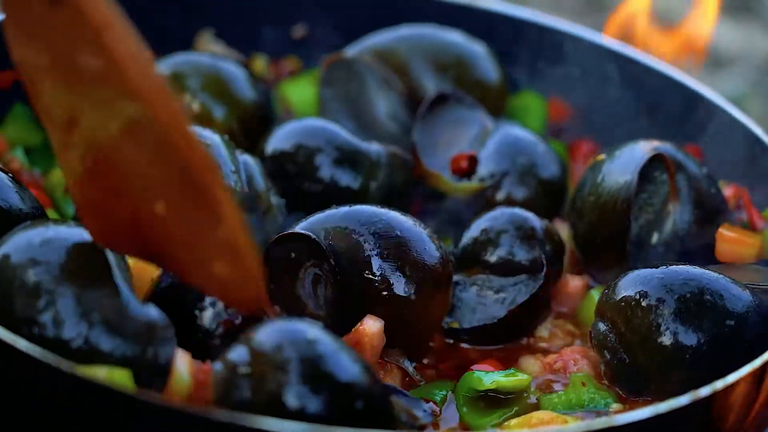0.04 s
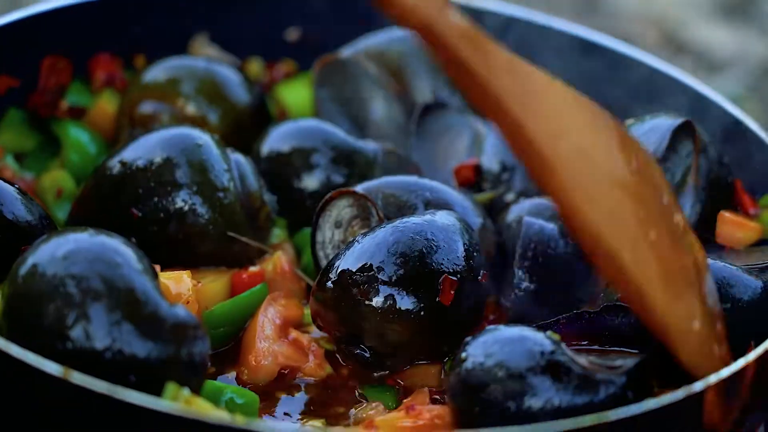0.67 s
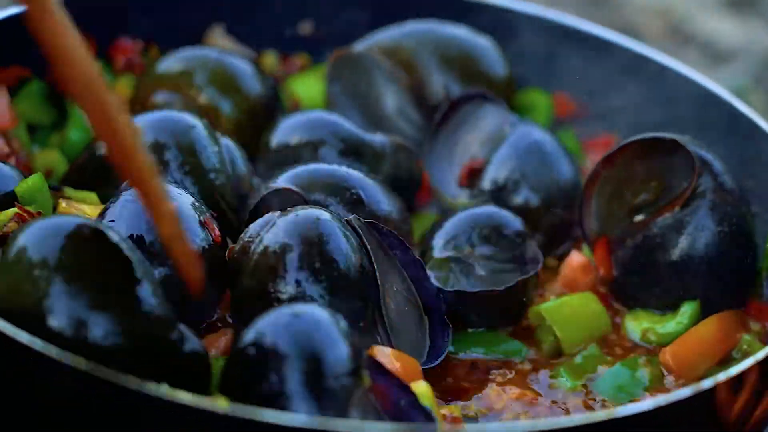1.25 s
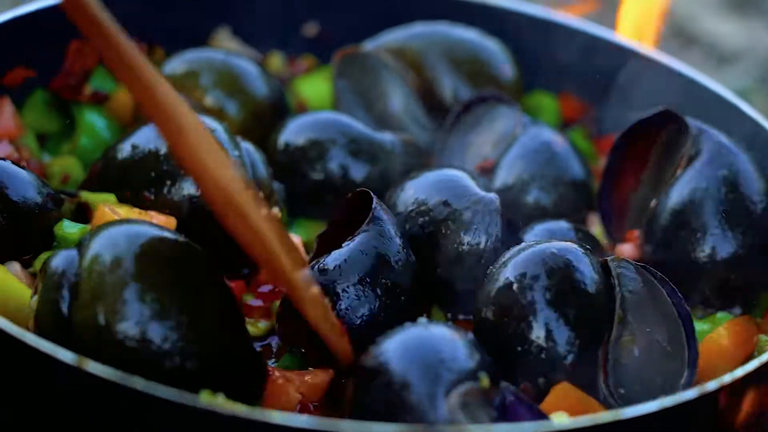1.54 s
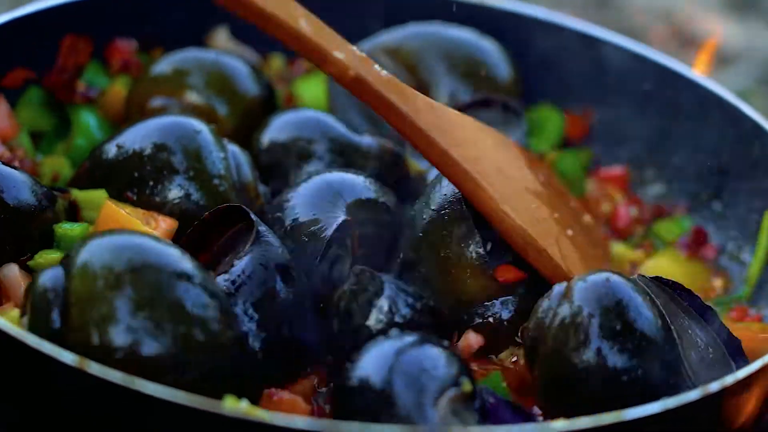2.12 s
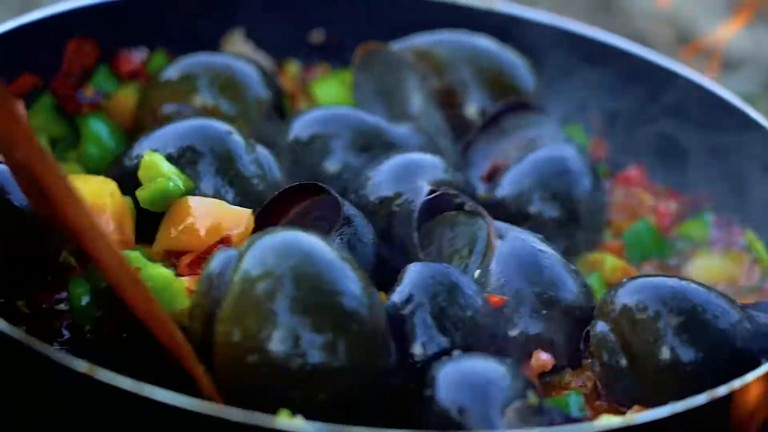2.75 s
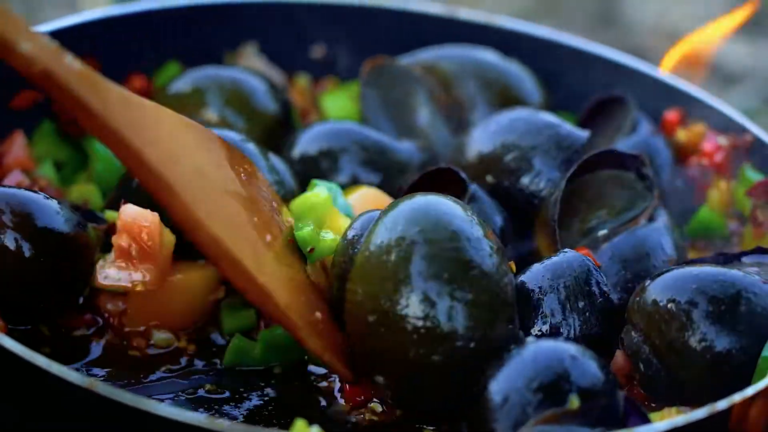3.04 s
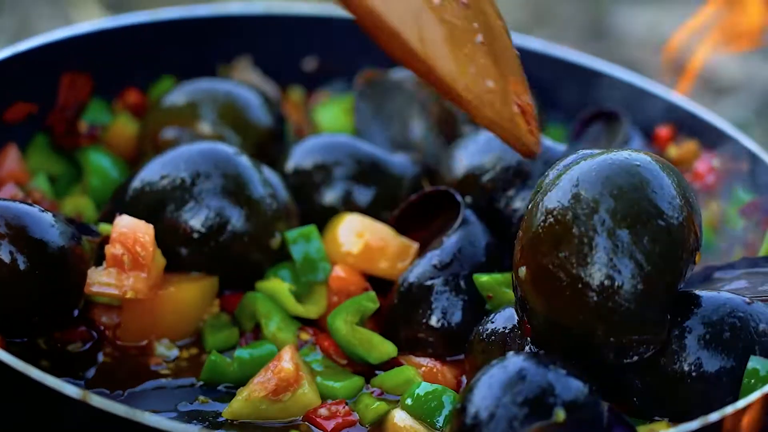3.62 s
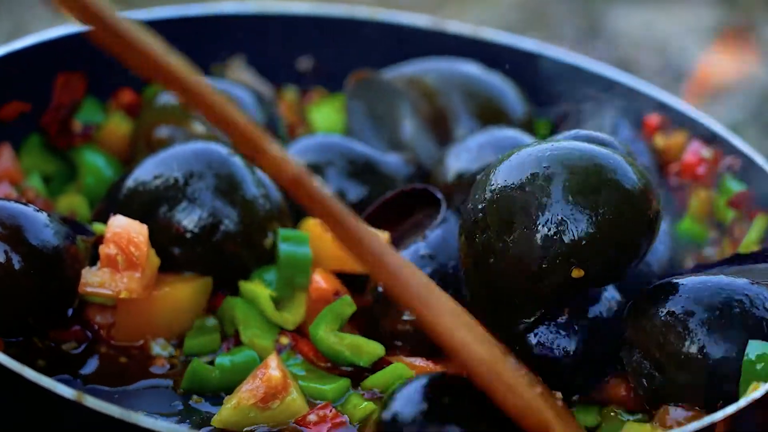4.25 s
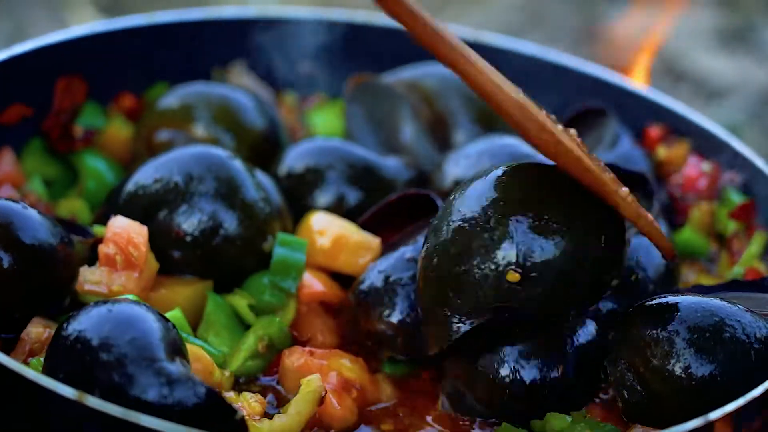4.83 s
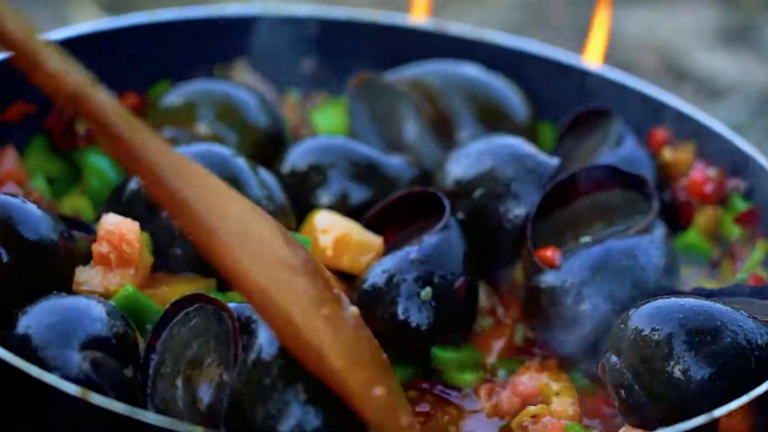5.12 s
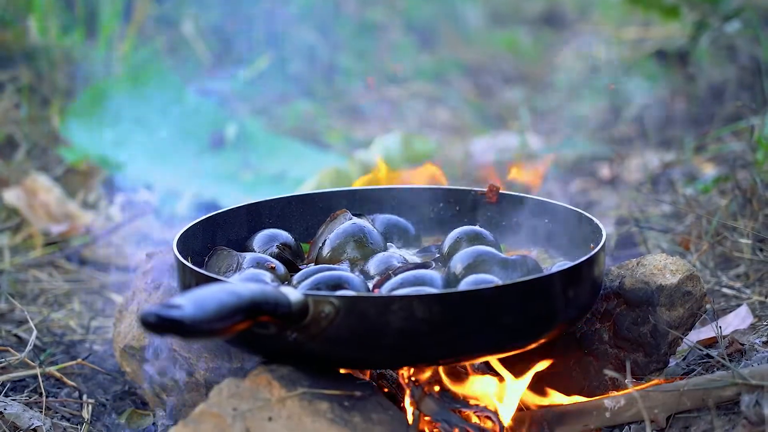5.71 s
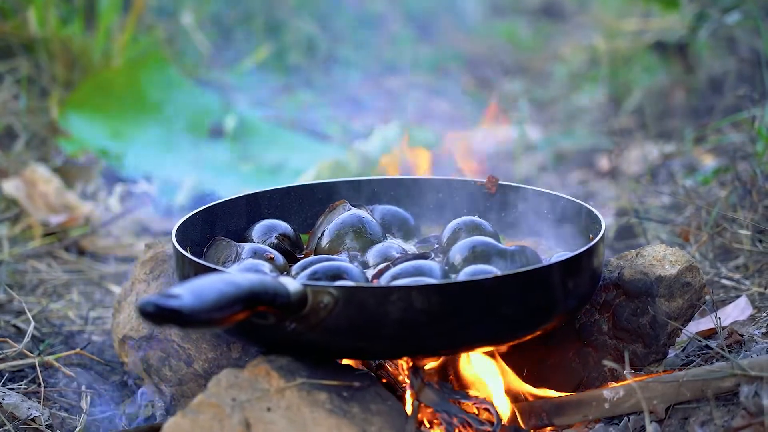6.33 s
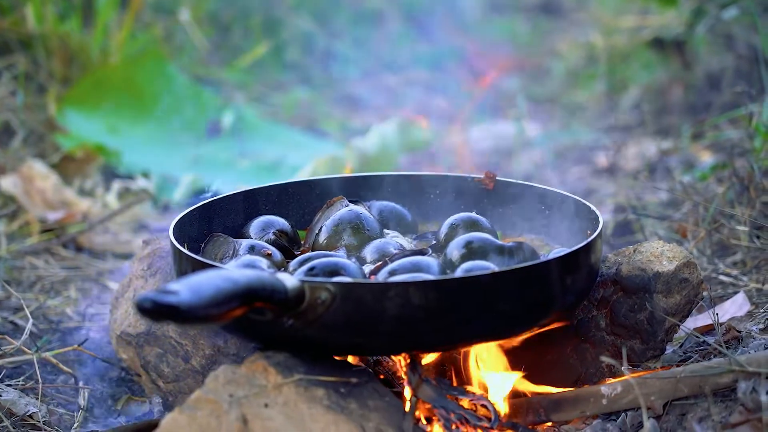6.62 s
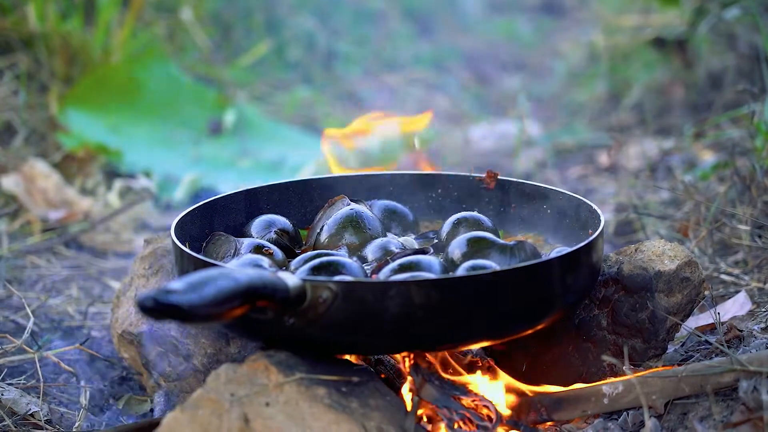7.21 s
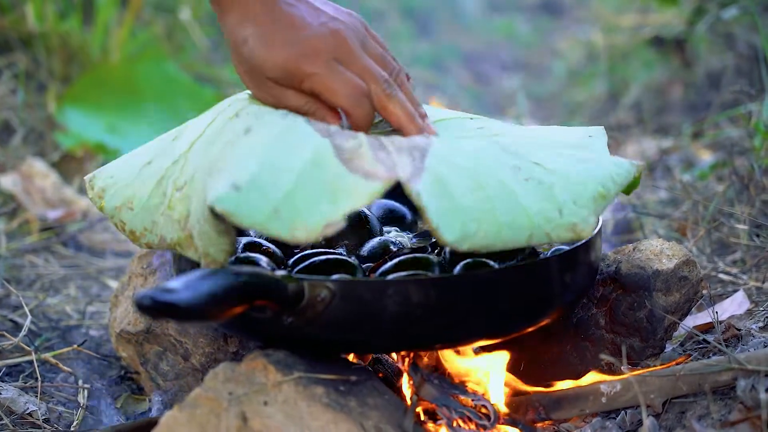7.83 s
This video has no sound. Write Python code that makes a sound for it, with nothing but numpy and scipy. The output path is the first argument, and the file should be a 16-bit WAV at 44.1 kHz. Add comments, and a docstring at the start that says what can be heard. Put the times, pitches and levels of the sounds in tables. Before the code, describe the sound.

From the start, sauce, vegetables and snail shells fry very close in a pan over an outdoor wood fire: a loud, bright, wet sizzle, slightly to the right, with sharp spits of fat. Flames rumble underneath, swelling with a few puffs of wind. A wooden spatula stirs throughout, giving hollow knocks, short scrapes and clusters of hard shell clacks, strongest around 0.8, 1.4, 2.1, 2.8, 4.2 and 4.9 seconds. The hardest knocks briefly dip the sizzle. Steam hisses brighter near 3.2 seconds, and a shell topples with a soft thud at about 5 seconds.

At 5.3 seconds the frying cuts off and a much quieter view from a step away fades in. Sauce simmers and plops gently over low flames and ticking embers. Firewood snaps irregularly, sharpest near 6.3 and 7.2 seconds. A faint, high insect pulses in the grass over a distant low hum until the end, around 8 seconds.

```python
"""Sauce sizzles and spits close up: snail shells and vegetables fry in a pan on a wood fire outdoors.
Steam bursts in the hot fat while a wooden spatula knocks the shells against each other and the pan,
over the rumble of the flames; the hardest knocks make a limiter duck the sizzle.
Then a wider view fades in: the sauce simmers softly, sap snaps in the firewood and an insect pulses
in the grass, over a faint, distant hum."""
import sys
import numpy as np
from scipy import signal
from scipy.fft import rfft, irfft, next_fast_len
from scipy.io import wavfile
from scipy.ndimage import uniform_filter1d, minimum_filter1d

SR = 44100
rng = np.random.default_rng(int(sys.argv[2]) if len(sys.argv) > 2 else 0)


def to_wav(sig):
    """Store sig (one row per channel, or 1-D mono) as 16-bit WAV at the path in sys.argv[1].

    Samples outside -1..1 are clipped; the rate is SR.
    """
    pcm = np.clip(np.atleast_2d(sig), -1, 1) * 32767
    pcm = np.round(pcm).astype(np.int16)
    wavfile.write(sys.argv[1], SR, pcm.T)  # frames by channels


N = 351477
T = np.arange(N) / SR

# ride of the frying: (time [s], sizzle level [dB], steam hiss trim [dB])
FRYING_LEVELS = [(0, -26, 1.5), (.28, -27.5, -1), (.43, -24.5, 1), (.52, -27, 1), (.68, -26.5, 0),
                 (.75, -27, -2), (1.05, -25.5, 1), (1.4, -28, -2.5), (1.6, -25.5, -3), (1.8, -28, -4.5),
                 (2.1, -27.5, -1.5), (2.2, -26.5, 0), (2.55, -28, -5), (2.76, -27, -4), (2.87, -26, -2.5),
                 (2.98, -28.5, 2), (3.17, -27, 7), (3.42, -27, 1), (3.55, -28, 3), (3.66, -27, 4),
                 (3.77, -26.5, 1), (4.1, -28, 1.5), (4.45, -27.5, 2), (4.8, -27.5, -0.5), (5.12, -26.5, 1),
                 (5.17, -30.5, 1), (5.25, -26, -1.5)]
# tone of bursting steam: (frequency [Hz], gain [dB])
SIZZLE_EQ = [(150, -23.5), (400, -7.5), (600, -6), (790, -19.5), (1000, -5.5), (1500, -3.5), (2700, -0.5),
             (3400, -2), (4500, 2.5), (5150, -1), (5700, 1.5), (9000, 1.5), (10500, -0.5), (16000, -2.5)]
# extra brightness of the finest steam: (frequency [Hz], gain [dB])
STEAM_EQ = [(3000, -1.1), (12000, 0.7)]
# loudest spits of fat: (time [s], peak [dB])
FAT_SPITS = [(0.243, -12), (0.404, -9), (0.438, -5.5), (0.562, -6), (0.608, -4), (0.686, -9), (0.791, -9),
             (0.928, -8), (0.967, -10), (1.104, -4), (1.202, -6), (1.506, -6), (1.723, -7), (2.183, -4),
             (2.473, -8.5), (2.691, -6), (2.82, -8.5), (2.903, -5), (3.039, -6), (3.173, -6.5), (3.777, -7),
             (3.861, -5), (4.071, -5.5), (4.734, -8), (4.777, -8.5), (5.011, -7), (5.111, -10), (5.139, -5),
             (5.236, -5)]
# tone of a spit: (frequency [Hz], gain [dB])
SPIT_EQ = [(300, -26), (1500, -12), (3000, 0.5), (7000, 2), (10000, -4.5), (16000, -3), (19000, -20.5)]
# shell hits: (time [s], level [dB], pitch [Hz], ring length [x a free shell's],
# pan ring [dB re shell], lip ring [dB re shell], lip pitch [Hz])
SHELL_KNOCKS = [(0.184, -19.5, 1620, 0.63, 1, -6, 2280), (0.223, -23, 2580, .3, -20, -4, 3920),
                (0.2644, -14, 1650, 0.84, -9.5, -9, 2280), (0.317, -17, 2030, 1.2, -26, -26, 3700),
                (0.3935, -22.5, 1970, 0.27, -20, -7, 2700), (0.707, -13, 1680, 0.46, -5, -1, 5820),
                (0.7242, -24, 1500, .5, -1, 4, 3900), (0.787, -23, 1480, .5, -9, -6, 2000),
                (0.82, -12, 1935, 1.3, -28, -11, 3440), (0.8595, -30.5, 1860, .6, 2.5, 6.5, 4320),
                (0.881, -27, 2000, .8, -18, -18, 3600), (0.909, -23.5, 2020, 1, -22, -18, 3600),
                (1.061, -26, 2630, .4, -2.5, -8, 3800), (1.076, -14.5, 2150, 0.69, -12, -14, 3500),
                (1.0915, -25, 1800, .7, -17.5, -8, 2800), (1.321, -12, 2110, 1.1, -16, -4, 3940),
                (1.3654, -25, 2900, .3, -21, -4.5, 4600), (1.3926, -13, 1880, 0.56, -19, -17, 3200),
                (1.4, -26, 3200, .6, -20, -3, 3900), (1.405, -24, 2000, .6, -12, -12, 3500),
                (1.4094, -12.5, 2150, .8, -18, -11, 3500), (1.4308, -18, 2450, 0.64, -14, -8, 2970),
                (1.528, -26.5, 1900, .6, -14, -10, 3000), (1.8247, -24, 2250, 0.39, -18, -0.5, 4300),
                (1.8888, -12.5, 1950, 0.6, -8.5, -5, 3630), (2.055, -27, 2000, .3, -12, 0, 4270),
                (2.0907, -13, 1570, .45, -8, -3, 2880), (2.1066, -20, 1440, .7, -3, -13, 4500),
                (2.136, -20, 2520, 0.28, -24, -9, 3200), (2.1502, -19, 1360, 1.2, -11, -8, 2700),
                (2.3871, -23.5, 2590, .3, -8, -4, 3500), (2.4173, -20, 1920, .7, -12, 0.5, 3370),
                (2.6022, -22.5, 2320, .6, -7, -1.5, 4300), (2.6072, -21.5, 1940, 1.7, -2.5, 0, 2500),
                (2.654, -25.5, 2200, .5, -8, -3, 3600), (2.699, -25.5, 3620, .3, -22, 0, 5460),
                (2.728, -25, 1800, .4, -21.5, -2, 4500), (2.7352, -12.5, 1490, 1.9, -30, -6, 2900),
                (2.7361, -18, 3000, 0.44, -25, 0.5, 5870), (2.7698, -15, 1370, 0.51, -3.5, -5, 2040),
                (2.836, -18, 1880, .7, -15, -10.5, 2700), (2.8894, -16.5, 2000, 0.6, -14, -6, 1290),
                (3.3068, -21, 1390, 0.5, -9, -6, 2000), (3.367, -21.5, 1340, .8, -4.5, -3, 2200),
                (3.378, -23.5, 2160, .5, -9, -1.5, 4400), (3.417, -20.5, 1810, 1.2, -7, -19, 2600),
                (3.508, -22.5, 2850, 0.28, -17, -21, 4500), (3.709, -23, 1920, .5, 4, -7, 2650),
                (3.7277, -21.5, 2120, 0.55, -15, -3, 3500), (3.7786, -28, 2250, .5, 8.5, -6, 3530),
                (4.1524, -19, 3400, 1.3, -21, -17, 4930), (4.156, -13.5, 2030, 0.97, -5.5, -6.5, 3760),
                (4.208, -26, 1450, .6, -8, -3, 2700), (4.284, -28, 1730, .5, -4, -10, 3300),
                (4.3566, -28, 1890, .5, -0.5, -12, 3600), (4.3786, -30, 2540, .5, 3.5, -14, 4200),
                (4.854, -11, 2140, 0.54, -11, -12, 2920), (4.9556, -21.5, 1370, .8, -5, -14, 2700),
                (4.9695, -25.5, 1340, .6, 11, -1, 1750), (5.0185, -24, 2750, .45, -15, -7, 1450),
                (5.0467, -26, 3160, .4, -14, 1, 3900)]
# ring of a free shell: (ratio to its pitch [x], level [dB], t60 [s])
FREE_SHELL_MODES = [(0.699, -24.5, 0.013), (.85, -26, .012), (1.001, 2.5, 0.018), (1.14, 1.5, 0.013),
                    (1.33, -8, 0.01), (1.55, -14, 0.0083), (1.83, -5, 0.018), (2.3, -17, .01),
                    (2.8, -13, .014)]
# ring of a shell's thin lip: (ratio to the lip pitch [x], level [dB], t60 [s])
SHELL_LIP_MODES = [(.88, -8, 0.0071), (1, 1.5, 0.021), (1.1, -8.5, .01), (1.5, -4.5, 0.019)]
# ring of the food-damped pan: (frequency [Hz], level [dB], t60 [s])
DAMPED_PAN_MODES = [(427, -20.5, 0.01), (520, -7.5, 0.012), (615, 11, 0.022), (810, -3, 0.016),
                    (975, -1, 0.027), (1370, -6, 0.017), (1620, -8.5, .014), (2320, -11, .012)]
# a shell topples into the sauce: when, and its (frequency [Hz], level [dB], t60 [s])
THUD_S, THUD_MODES = 4.965, [(185, -24, 0.075), (243, -21, 0.058), (338, -29, 0.057)]
# hollow knocks of the spatula: (time [s], level [dB], pitch [Hz])
BLADE_KNOCKS = [(0.276, -30, 900), (0.299, -28, 1050), (0.3936, -28, 1110), (0.793, -24.5, 850),
                (0.9955, -28, 1100), (1.383, -25, 1160), (1.3928, -18, 1080), (2.286, -29, 1010),
                (2.332, -27, 646), (2.753, -27, 1150), (2.803, -22.5, 1250), (2.937, -30.5, 1150),
                (3.4166, -24, 980), (3.709, -16, 990), (3.7274, -30, 1100), (5.016, -30, 950)]
# ring of its wooden blade: (ratio to its pitch [x], level [dB], t60 [s])
BLADE_MODES = [(.55, -5.5, .01), (1, -1, 0.014), (1.35, -1, .009), (2.1, -7.5, .006)]
# the spatula pushes the shells along: (centre [s], length [s], level [dB])
PUSHES = [(0.277, 0.21, -40.5), (0.79, 0.086, -34.5), (0.898, 0.093, -36.5), (1.062, 0.14, -37),
          (1.383, 0.008, -32), (1.404, 0.017, -30), (2.124, 0.13, -32), (2.37, 0.12, -38.5),
          (2.62, 0.037, -34), (2.812, 0.092, -32.5), (3.387, 0.093, -36.5), (4.168, 0.02, -31),
          (4.223, 0.06, -36.5), (4.356, 0.12, -40), (4.936, 0.047, -29), (5.033, 0.059, -29)]
# tone of shells sliding on the pan: (frequency [Hz], gain [dB])
SCRAPE_EQ = [(150, -16.5), (380, -10.5), (520, -9), (620, 1), (780, -10), (1000, -4), (1400, -2),
             (2100, -8.5), (3000, -4.5), (6000, -16.5), (12000, -43)]
# flames close by: (time [s], level [dB])
CLOSE_FLAME_LEVELS = [(0, -37), (2.0, -35), (3.7, -35), (5.27, -38)]
# tone of the close flames: (frequency [Hz], gain [dB])
CLOSE_FLAME_EQ = [(12, -34), (24, -8), (32, -2.5), (45, -.5), (85, -3.5), (130, -12), (200, -17),
                  (300, -21.5), (450, -31), (800, -36.5), (3000, -83)]
# flames a step away: (time [s], level [dB])
WIDE_FLAME_LEVELS = [(5.55, -37.5), (5.9, -33), (6.2, -32), (6.8, -33.5), (7.97, -32.5)]
# tone of the flames a step away: (frequency [Hz], gain [dB])
WIDE_FLAME_EQ = [(12, -26), (30, -14), (42, -10.5), (54, 2.5), (64, -9.5), (76, -5), (89, -10), (98, -2),
                 (110, -15), (160, -17.5), (185, -25.5), (280, -29), (335, -24.5), (380, -35), (500, -42),
                 (1000, -45.5), (3000, -59.5)]
# puffs that fan the fire: (centre [s], length [s], level [dB])
WIND_PUFFS = [(0.255, 0.026, -27), (1.15, 0.21, -34), (1.725, 0.3, -27.5), (3.18, .1, -28)]
# ride of the simmering sauce: (time [s], level [dB])
SIMMER_LEVELS = [(5.55, -52), (5.8, -51), (6.1, -52), (6.7, -50.5), (7.3, -50), (7.6, -51.5), (7.97, -51.5)]
# tone of its seething: (frequency [Hz], gain [dB])
SIMMER_EQ = [(100, 1.5), (300, 3.5), (500, 2.5), (750, -4.5), (1000, -0.5), (1250, -6.5), (1700, -0.5),
             (2000, -7), (2350, -3.5), (3000, -12), (5000, -20), (8000, -24), (16000, -51)]
# snaps of the firewood: (time [s], crack peak [dB], woody body peak [dB])
WOOD_SNAPS = [(5.517, -20, -27), (5.7594, -21, -40), (5.7954, -24, -28.5), (6.012, -23, -41),
              (6.223, -15.5, -36), (6.33, -11.5, -28), (6.379, -22, -34), (6.729, -30, -24),
              (6.893, -17.5, -41), (6.9157, -19.5, -39), (7.0602, -21, -26), (7.15, -22.5, -35),
              (7.1808, -7.5, -44), (7.2546, -15, -26), (7.311, -32, -29), (7.345, -23, -46),
              (7.42, -26, -46), (7.4719, -23, -46), (7.4967, -20, -43), (7.5552, -19.5, -44),
              (7.7777, -24, -43), (7.816, -26, -46)]
# tone of a snap's crack: (frequency [Hz], gain [dB])
SNAP_EQ = [(500, -12), (3000, -4), (5000, -4.5), (7000, -1), (13000, -2), (16000, -1)]
# tone of ticking embers: (frequency [Hz], gain [dB])
EMBER_EQ = [(500, 2), (2000, -9.5), (4600, 1.5), (8000, -1.5), (12000, -3), (14000, -5), (16000, -8)]
# the insect's song: (time [s], pitch [Hz], level at a chirp's crest [dB])
INSECT_SONG = [(5.4, 8720, -52), (6.35, 8720, -48), (6.9, 8740, -48.5), (7.3, 8790, -49.5),
               (7.45, 8870, -52.5), (7.97, 8970, -53.5)]
# distant hum: (frequency [Hz], level [dB], waver [dB])
HUM_TONES = [(53.8, -38, 2), (502, -59.5, 1), (1090, -67, 2)]


def sizzle(mist_db=-3, crackle_db=-2.5, bubbles_db=-6, pan_db=-4):
    """Tiny steam bursts merge into a hiss; larger ones crackle, and wet bubbles ring among the shells."""
    fry_db, steam_db = curves(FRYING_LEVELS)
    mid, side = (unit(colour(colour(bursts(12000, 4.9), SIZZLE_EQ), STEAM_EQ)) for _ in range(2))
    mist = widen(mid, side, half_hz=3000, side_db=-1.2)
    # each burst has its own place in the pan
    crackle = colour(bursts(2200, 4.6) * place(5 * rng.standard_normal(N) - 1), SIZZLE_EQ)
    # the pan wall returns it a moment later, by a path that shifts as the shells are stirred
    lag_s = 0.001116 * (1 + 0.034 * walk(3))
    reflection = np.array([np.interp(T - lag_s, T, channel) for channel in crackle])
    crackle = unit(crackle + .33 * reflection)
    fry = (undb(mist_db + steam_db) * mist + undb(crackle_db) * crackle) * place(pan_db)
    wet = bubbling(2014, 6500, rate=2200, spread_db=4.5, cycles=2.0, wander_db=3, pan_db=3.0)
    # the sauce bubbles more evenly than the steam hisses
    wet_db = bubbles_db + fry_db.mean() + 0.22 * (fry_db - fry_db.mean())
    return shimmer(fry, depth_db=1.36) * undb(fry_db + 0.9 * walk(27.96)) + wet * undb(wet_db)


def bubbling(low_hz, high_hz, rate, spread_db, cycles, wander_db, pan_db, sizes=16):
    """Bubbles ring for a few cycles, rising in pitch; each size comes and goes in its own spot."""
    out, t = np.zeros((2, N)), np.arange(SR // 70) / SR
    for hz in np.geomspace(low_hz, high_hz, sizes):
        ping = np.sin(2 * np.pi * hz * t * (1 + 12 * t)) * np.exp(-t * hz / cycles) * np.sqrt(hz)
        swarm = bursts(rate / sizes, spread_db) * undb(wander_db * walk(7))
        out += signal.oaconvolve(swarm, ping)[:N] * place(pan_db + 3 * rng.standard_normal())
    return unit(out)


def spatter(trim_db=-10, rate=110, spread_db=5.5, pan_db=-6.0):
    """Fine droplets snap in the fat, sharp and bright above the hiss."""
    droplets = bursts(rate, spread_db) * place(pan_db + 3 * rng.standard_normal(N))
    bright = unit(colour(droplets, [(500, -21.5), (3000, -4.5), (7000, 0.5), (16000, -1)]))
    return bright * undb(trim_db + curves(FRYING_LEVELS)[0])


def spits(pan_db=-5, scatter_db=1.6):
    """Drops of water burst in the hot fat, each in its own spot."""
    out = np.zeros((2, N))
    for s, db in FAT_SPITS:
        spit = pop(SPIT_EQ, tail_db=-14.5, tail_s=0.00067)
        add(out, s, spit * undb(db) * place(pan_db + scatter_db * rng.standard_normal()))
    return out


def knocks(crack_db=-6, crack_s=0.0014, bounce_db=-4, bounce_s=.0016, tick_db=16, tick_per_lip=0.71):
    """Each hit ticks, bounces and chatters, ringing a shell, its lip and the pan; one shell topples."""
    shells, pan = np.zeros((2, N)), np.zeros((2, N))
    t = np.arange(SR // 16) / SR
    for s, db, hz, length, pan_ring_db, lip_db, lip_hz in SHELL_KNOCKS:
        contact = impact(t, tail_db=-29, tail_s=0.0088)
        # the rebound comes in step with the ringing shell
        bounce_cycles = np.ceil(bounce_s * hz * rng.uniform(.5, 1))
        contact[int(bounce_cycles / hz * SR)] += undb(bounce_db)
        shell_ring = signal.fftconvolve(contact, ring(shell_modes(hz, length), t))[:len(t)]
        # the food retunes the pan as it shifts, and a film of sauce softens the onset
        tuning = 1 + 0.047 * rng.standard_normal()
        pan_ring = ring(DAMPED_PAN_MODES, t, tuning) * (1 - np.exp(-t / 0.00046))
        crack = rng.standard_normal(len(t)) * np.exp(-t / crack_s)
        crack = colour(crack, [(800, -23), (3000, 0), (6000, 7), (10000, -17.5)])
        lip_ring = unit_hit(ring(SHELL_LIP_MODES, t, lip_hz)) + undb(crack_db) * unit_hit(crack)
        layers = [(shells, shell_ring, 0, .3),
                  (pan, pan_ring, pan_ring_db, 1.6),
                  (shells, lip_ring, lip_db, -1)]
        for bus, layer, trim_db, left_db in layers:
            spot = place(left_db + 6.5 * rng.standard_normal())
            add(bus, s, unit_hit(layer) * undb(db + trim_db) * spot)
        # the more a blow catches the lip, the louder its first tick
        tick = pop([(500, -23), (3000, 2), (7000, -0.5), (16000, 1.5)], tail_db=-23, tail_s=0.00065)
        add(shells, s, tick * undb(db + tick_db + tick_per_lip * lip_db))
    out = low_cut(shells, hz=750) + low_cut(pan, hz=400)
    thud = ring(THUD_MODES, t) * (1 - np.exp(-t / 0.0052))
    add(out, THUD_S, thud)
    return out


def shell_modes(hz, length, shape_spread=.09):
    """Every shell is coiled a little differently, which stretches or squeezes its overtones."""
    stretches = 1 + shape_spread * rng.standard_normal(len(FREE_SHELL_MODES))
    return [(hz * ratio ** stretch, db, t60 * length)
            for (ratio, db, t60), stretch in zip(FREE_SHELL_MODES, stretches)]


def spatula():
    """The wooden blade knocks and drags briefly; its pitch depends on where it is struck."""
    out, t = np.zeros((2, N)), np.arange(SR // 16) / SR
    for s, db, hz in BLADE_KNOCKS:
        contact = impact(t, tail_db=-25, tail_s=.005)
        wood = signal.fftconvolve(contact, ring(BLADE_MODES, t, hz))
        add(out, s, unit_hit(wood) * undb(db) * place(2 * rng.standard_normal()))
    return low_cut(out, hz=540)


def scrapes(rest_db=-48, rattle_db=-5):
    """Shells stick and slip over the pan and rattle together as the spatula pushes them."""
    push = undb(rest_db) + swells(PUSHES)
    slips = unit(colour(bursts(450, 3.6), SCRAPE_EQ)) * undb(1.9 * walk(70))
    side = unit(colour(bursts(900, 4), SCRAPE_EQ))
    scrape = widen(slips, side, half_hz=300, side_db=-11) * place(.8)
    return (scrape + undb(rattle_db) * rattle()) * push


def rattle(low_hz=1350, high_hz=2900, rate=180, spread_db=2.5, sizes=6):
    """Shells of several sizes jostle each other with light, dry ticks."""
    out, t = np.zeros((2, N)), np.arange(SR // 40) / SR
    shells = [ring(shell_modes(hz, length=0.97), t) for hz in np.geomspace(low_hz, high_hz, sizes)]
    for shell in shells:
        ticks = signal.oaconvolve(bursts(rate / sizes, spread_db), shell)[:N]
        out += ticks * place(2 * rng.standard_normal())
    return unit(out)


def flames(levels, eq, flicker_db, flicker_hz=9):
    """Gas from the wood burns at an even rate: a low, flickering flutter, alike on both sides."""
    mid, side = (unit(colour(rng.standard_normal(N), eq)) for _ in range(2))
    even = mid / np.sqrt(uniform_filter1d(mid ** 2, SR // 3))
    level_db = curves(levels)[0] + flicker_db * walk(flicker_hz)
    return widen(even, side, half_hz=100, side_db=-19) * undb(level_db)


def gusts():
    """Puffs of wind fan the flames into a deeper roar."""
    roar_eq = [(12, -38), (30, -1.5), (48, 2.5), (85, -5.5), (130, -15.5), (220, -31.5), (800, -68)]
    return unit(colour(rng.standard_normal(N), roar_eq)) * swells(WIND_PUFFS)


def simmer(seethe_db=5, plops_db=-1):
    """Thick sauce seethes and plops, heard from a step away."""
    mid, side = (unit(colour(bursts(3500, 3.6), SIMMER_EQ)) for _ in range(2))
    seethe = widen(mid, side, half_hz=200, side_db=-6) * place(-1.1) * undb(seethe_db + walk(40))
    plops = bubbling(1440, 2440, rate=190, spread_db=4.5, cycles=4.6, wander_db=2, pan_db=-1)
    return (seethe + plops * undb(plops_db)) * undb(curves(SIMMER_LEVELS)[0])


def firewood(embers_db=-58.5, ticks_db=-61):
    """Pockets of sap snap in the wood over the fine ticking of embers."""
    embers = undb(embers_db) * unit(colour(np.array([bursts(6000, 2.7), bursts(6000, 4)]), EMBER_EQ))
    ticks = bursts(70, 5.7) * place(4 * rng.standard_normal(N))
    snaps = undb(ticks_db) * unit(colour(ticks, EMBER_EQ))
    body_eq = [(300, -22), (1700, 13.5), (2400, 12.5), (5000, -11), (12000, -40)]
    for s, crack_db, body_db in WOOD_SNAPS:
        crack = np.array([pop(SNAP_EQ, tail_db=-19.5, tail_s=0.0029) for _ in range(2)])
        body = pop(body_eq, tail_db=-27, tail_s=0.0034)
        add(snaps, s, crack * undb(crack_db) + body * undb(body_db))
    return embers + hearth(snaps)


def hearth(x, wet_db=-9, decay_s=0.019):
    """The stones around the fire scatter each snap into a brief tail."""
    t = np.arange(SR // 16) / SR
    tail = unit(rng.standard_normal((2, len(t))) * np.exp(-t / decay_s)) / np.sqrt(len(t))
    return x + undb(wet_db) * signal.oaconvolve(x, tail, axes=1)[:, :N]


def insect(width_hz=235, waver_hz=45, chirp_hz=7.88, crest_s=6.298, stagger_s=.009, gap_db=-7):
    """A narrow, rasping wing resonance wavers in pitch and chirps with short, uneven gaps."""
    hz, db = curves(INSECT_SONG)
    rasp = rng.standard_normal((2, N)) + 1j * rng.standard_normal((2, N))
    rasp = signal.sosfilt(signal.butter(2, width_hz, fs=SR, output="sos"), rasp)
    carrier = np.exp(2j * np.pi * np.cumsum(hz + waver_hz * walk(25)) / SR)
    song = unit(np.real(rasp * carrier))
    gaps = np.sin(np.pi * chirp_hz * (T - crest_s + stagger_s * walk(6))) ** 4
    dip_db = gap_db * gaps * (1 + .3 * walk(8))
    return song * undb(db + dip_db + .6 * walk(27))


def hum(drift=.0015):
    """A low drone and two faint tones far off, wavering in level."""
    out = np.zeros(N)
    for hz, db, waver_db in HUM_TONES:
        waver = undb(waver_db * walk(7))
        phase = 2 * np.pi * np.cumsum(hz * (1 + drift * walk(4))) / SR
        out += undb(db) * unit(waver * np.sin(phase))
    return out


def shimmer(x, depth_db, bands=6, frames=9):
    """Neighbouring pitches swell and sink together, so the colour keeps shifting."""
    spectra = signal.stft(x, nperseg=512)[2]
    patches = rng.standard_normal(spectra.shape[1:])
    for _ in range(2):
        patches = uniform_filter1d(uniform_filter1d(patches, bands, axis=0), frames, axis=1)
    return signal.istft(spectra * undb(depth_db * unit(patches)))[1][:, :N]


def off_centre(x, lag_s=.000013):
    """The hottest fat lies to the right, so its sizzle reaches the left ear a little later."""
    hz = np.arange(N // 2 + 1) * SR / N
    left = irfft(rfft(x[0]) * np.exp(-2j * np.pi * hz * lag_s), N)
    return np.array([left, x[1]])


def limiter(x, ceiling_db=-12, hold_s=0.017, release_s=0.042, window=66):
    """A knock over the ceiling ducks the mix, which holds and swells back; lone spits slip through."""
    power = np.abs(uniform_filter1d(np.mean(x ** 2, axis=0), window))
    over_db = np.maximum(10 * np.log10(power + 1e-12) - ceiling_db, 1e-9)
    # instant attack, exponential release
    cut_db = np.exp(np.maximum.accumulate(np.log(over_db) + T / release_s) - T / release_s)
    half = int(hold_s * SR / 2) + window
    held = minimum_filter1d(undb(-cut_db), 2 * half + 1, origin=half - window // 2)
    return x * uniform_filter1d(held, window)


def bursts(rate, spread_db):
    """Random clicks, about `rate` a second, many small and a few large."""
    out, at = np.zeros(N), np.flatnonzero(rng.random(N) < rate / SR)
    size, sign = rng.standard_normal(N)[at], rng.choice([-1, 1], N)[at]
    out[at] = sign * undb(spread_db * np.minimum(size, 2.7))
    return unit(out)


def impact(t, tail_db, tail_s):
    """An impulse with a brief ragged tail."""
    return (t == 0) + undb(tail_db) * rng.standard_normal(len(t)) * np.exp(-t / tail_s)


def pop(eq, tail_db, tail_s):
    """One sharp, coloured click, peak 1."""
    click = colour(impact(np.arange(SR // 40) / SR, tail_db, tail_s), eq)
    return click / np.abs(click).max()


def ring(modes, t, tuning=1):
    """Decaying modes, their frequencies times `tuning`, struck a little differently every time."""
    pitch, db, t60 = np.transpose(modes)[:, :, None]
    detune, strength = rng.standard_normal((2, len(modes), 1))
    hz = tuning * pitch * (1 + .02 * detune)
    return np.sum(undb(db + 2 * strength - 60 * t / t60) * np.sin(2 * np.pi * hz * t), axis=0)


def colour(x, eq):
    """Minimum-phase EQ through (frequency [Hz], gain [dB]) points."""
    n = x.shape[-1]
    size = 2 * next_fast_len(n // 2 + 1024)
    hz, db = np.transpose(eq)
    gain = undb(np.interp(np.log(np.arange(size // 2 + 1) * SR / size + 1), np.log(hz), db))
    cepstrum = irfft(np.log(gain))
    cepstrum[1:size // 2] *= 2
    cepstrum[size // 2 + 1:] = 0
    return irfft(rfft(x, size) * np.exp(rfft(cepstrum)))[..., :n]


def low_cut(x, hz):
    """Small bodies radiate little bass."""
    return signal.sosfilt(signal.butter(3, hz, "high", fs=SR, output="sos"), x)


def curves(table):
    """Each column of a table, joined by straight lines in time."""
    s, *columns = np.transpose(table)
    return [np.interp(T, s, column) for column in columns]


def swells(table):
    """A smooth rise and fall in gain for each (centre [s], length [s], level [dB])."""
    return sum(undb(db) * np.exp(-2 * ((T - s) / length) ** 2) for s, length, db in table)


def walk(rate):
    """Smooth random wandering, rms 1."""
    step = max(int(SR / rate), 2)
    return unit(uniform_filter1d(np.repeat(rng.standard_normal(N // step + 1), step), step)[:N])


def place(pan_db):
    """Left and right gains for a level difference; positive leans left."""
    gains = undb(np.array([np.atleast_1d(pan_db), -np.atleast_1d(pan_db)]) / 2)
    return gains / np.sqrt(np.mean(gains ** 2, axis=0))


def widen(mid, side, half_hz, side_db):
    """Stereo pair that opens up towards the treble."""
    side = undb(side_db) * signal.lfilter(*signal.butter(1, half_hz, "high", fs=SR), side)
    return np.array([mid + side, mid - side])


def add(out, s, sound):
    """Mix a short sound in at time s."""
    start = int(s * SR)
    out[:, start:start + sound.shape[-1]] += sound[..., :N - start]


def undb(db):
    """Decibels to gain."""
    return 10 ** (np.asarray(db) / 20)


def unit(x):
    """Scale to rms 1."""
    return x / np.sqrt(np.mean(x ** 2) + 1e-18)


def unit_hit(x):
    """Scale a hit to rms 1 over its first 5 ms."""
    return x / np.sqrt(np.mean(x[:SR // 200] ** 2))


def scene(close_end_s=5.277, wide_start_s=5.274, fade_s=0.31):
    """The close view stops short and the wide view fades in."""
    close = off_centre(sizzle() + spatter() + spits()) + scrapes() + knocks() + spatula() + gusts()
    close += flames(CLOSE_FLAME_LEVELS, CLOSE_FLAME_EQ, flicker_db=0.73)
    wide = simmer() + firewood() + insect() + hum()
    wide += flames(WIDE_FLAME_LEVELS, WIDE_FLAME_EQ, flicker_db=0.5)
    stop = np.exp(-np.maximum(T - close_end_s, 0) / 0.0039)
    fade_left = np.clip(1 - (T - wide_start_s) / fade_s, 0, 1)
    fade_in = (T > wide_start_s) * undb(-41 * fade_left ** 1.47)
    return close * stop + wide * fade_in


def record(dry):
    """Limit the hardest knocks and cut the top above 16 kHz."""
    return signal.sosfilt(signal.ellip(10, .2, 80, 16000, fs=SR, output="sos"), limiter(dry))


dry = scene()
out = record(dry)
to_wav(out)
```